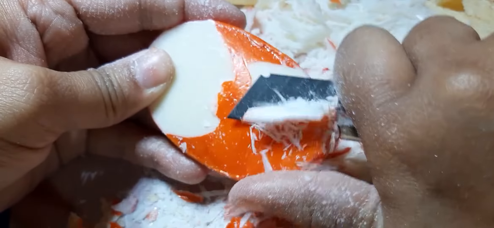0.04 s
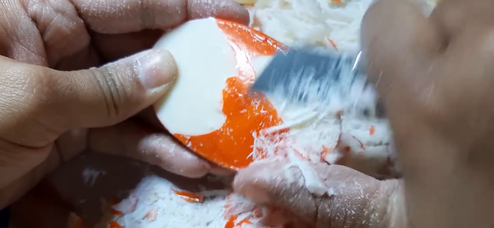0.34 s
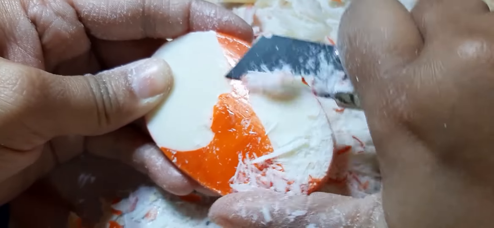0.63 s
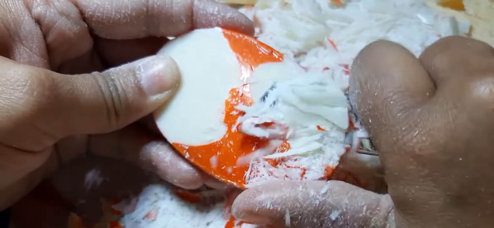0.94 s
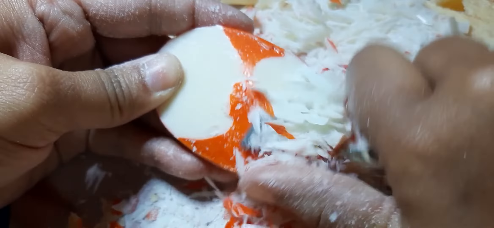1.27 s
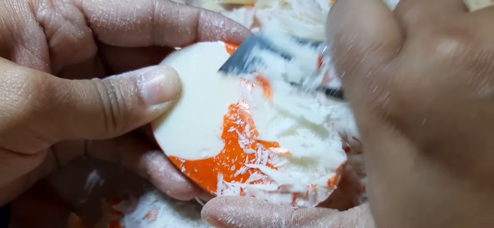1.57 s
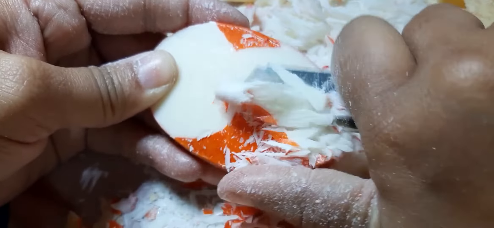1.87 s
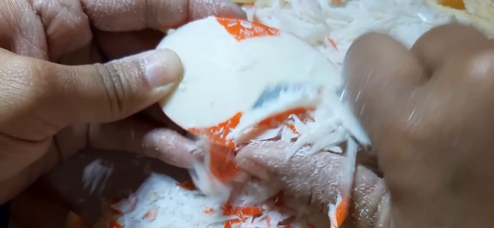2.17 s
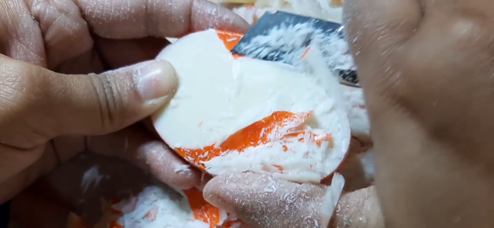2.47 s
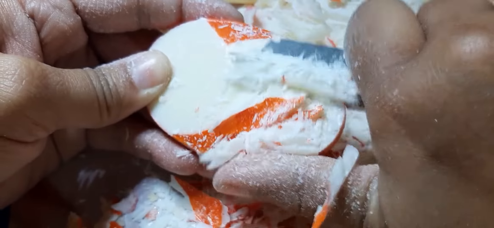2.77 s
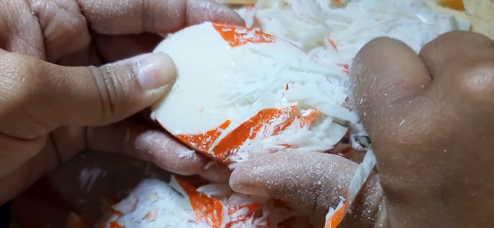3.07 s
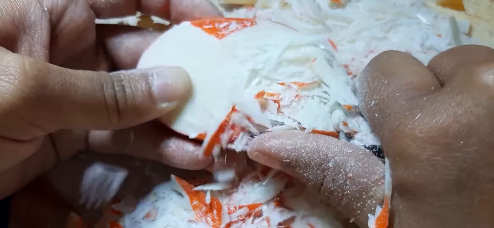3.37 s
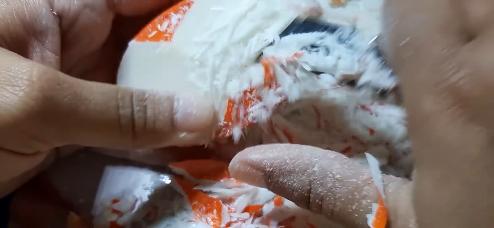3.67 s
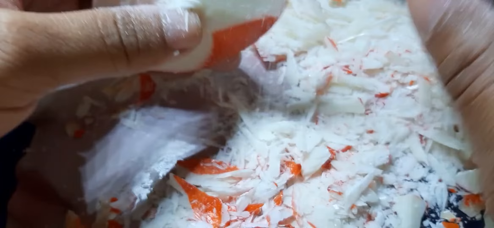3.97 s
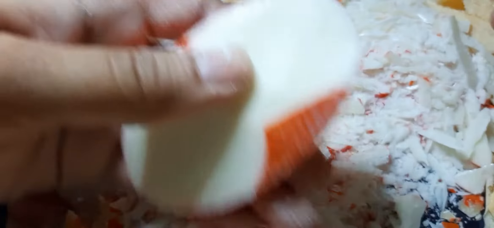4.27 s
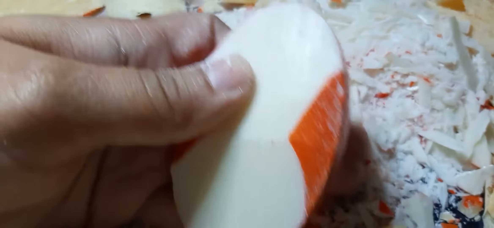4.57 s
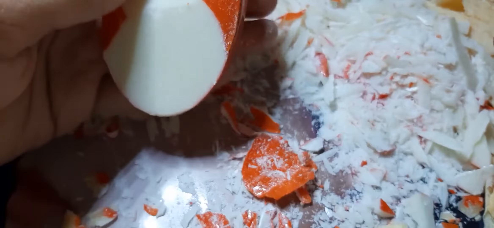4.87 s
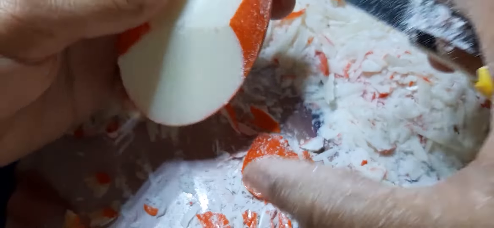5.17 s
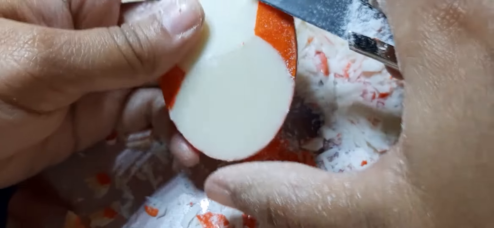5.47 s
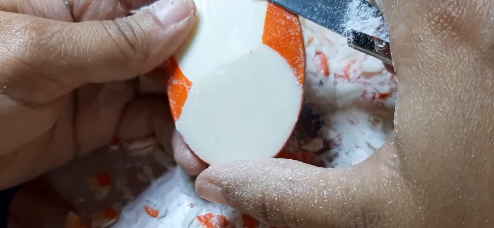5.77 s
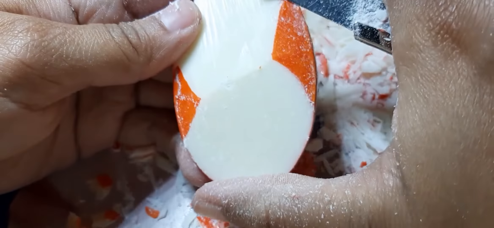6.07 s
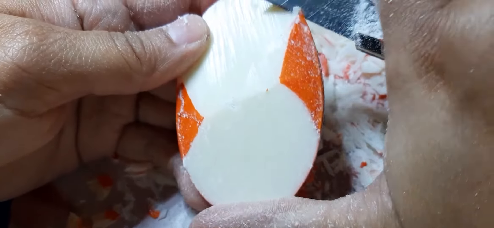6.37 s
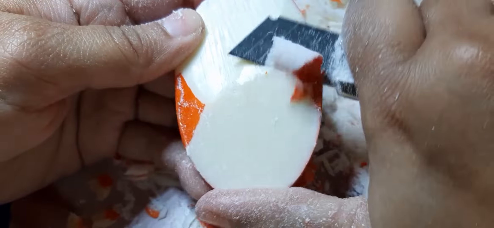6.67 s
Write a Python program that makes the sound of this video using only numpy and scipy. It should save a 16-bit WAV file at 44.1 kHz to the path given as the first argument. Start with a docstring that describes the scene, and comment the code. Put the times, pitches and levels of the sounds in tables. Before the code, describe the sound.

Heard close up in a quiet room, dry soap crackles and rasps as a hand-held blade shaves it stroke after stroke, shedding tiny ticking flakes. Midway come a few taps, a brief metallic flick of the blade and a louder rustling sweep through the loose shavings. Small clicks and faint finger rubbing follow as the bar is gripped anew, then one more crunchy cut near the end.

```python
"""Shaving a dry bar of soap

A utility blade cuts the soap close by, over a table in a quiet room. Its edge rasps through the crust
in countless tiny breaks, then sticks and slips in crunchy bursts that thud through the bar.
Flakes snap off and patter down. Midway, hands shake off the loose shavings, sweep them aside
and grip the bar anew, and the cutting goes on."""
import sys
import numpy as np
from scipy import signal
from scipy.fft import rfft, irfft
from scipy.io import wavfile
from scipy.ndimage import uniform_filter1d

SR = 44100
rng = np.random.default_rng(int(sys.argv[2]) if len(sys.argv) > 2 else 0)


def generate_wav(signal):
    """Clip the signal to [-1, 1] and save it as 16-bit WAV at the path in sys.argv[1]."""
    frames = np.transpose(np.atleast_2d(signal))
    scaled = np.clip(frames, -1, 1) * 32767
    pcm = np.round(scaled).astype(np.int16)
    wavfile.write(sys.argv[1], SR, pcm)


N = 304731

# Levels in the tables are relative: a function may turn a whole layer up or down.
# where the bar, the blade and the crumbs sound: (lowest pitch [Hz], highest pitch [Hz])
BASS, MIDDLE, TREBLE = (25, 450), (450, 3500), (3500, 18000)
# tone colours, or how strong each pitch is in a sound: (pitch [Hz], level [dB])
FLAT_COLOUR = [(1, 0), (SR, 0)]
ROOM_COLOUR = [(30, -13.5), (80, -1.5), (500, -2), (1250, -12), (3300, -19.5), (5500, -7.5), (11000, -9),
               (16000, -22.5)]
SHAVINGS_COLOUR = [(25, -17.5), (70, 5), (170, 4), (300, 5), (700, -1.5), (1600, -8), (3800, -12.5),
                   (6500, -6), (10500, -8.5), (13000, -11.5), (16000, -32.5)]
SKIN_COLOUR = [(60, 6), (300, -3), (900, -3), (1400, -19), (3500, -14), (5500, -3.5), (10000, -5),
               (16000, -13)]  # skin on soap
SOAP_COLOUR = [(25, -36), (60, -0.5), (200, 0.5), (450, -10.5), (1000, -12.5), (1800, -19), (3000, -25),
               (5000, -24.5), (8000, -22), (13000, -24), (16000, -34.5)]  # soap breaking
# resonances, the pitches at which a thing likes to ring: (pitch [Hz], width [Hz], boost [dB])
TABLE_RESONANCES = [(292.6, 70, -3.5), (479, 120, -4.5), (770, 400, 1.5), (2470, 210, 3.5)]
PALM_RESONANCES = [(310, 55, 6), (516, 380, 9), (690, 120, 5), (890, 76, 8), (5450, 700, 10)]  # the hollow between hand and bar
CUT_RESONANCES = [(85, 87, 6), (162, 86, 4), (1580, 180, 4.5), (2152, 366, 12.5), (3200, 170, 1),
                  (4550, 210, 3.5), (5290, 870, 4), (6550, 490, 3), (7550, 580, 4), (9710, 990, -3),
                  (11080, 390, 3.5)]  # the hand-held bar and the blade
# passing changes of tone: a list of (start [s], end [s]), then one of (pitch [Hz], width [Hz], boost [dB])
CRUSHING_HEAP = [(4.3, 4.46)], [(3305, 1040, 6.5)]  # the hand lands on the shavings
AT_THE_RIM = [(1.0, 1.09), (2.95, 3.26)], [(200, 110, 5), (4580, 1040, 8.5), (3120, 1300, -3)]  # the blade cuts at the rim of the bar
DIGGING_IN = [(1.5, 2.0), (6.54, 6.91)], [(65.2, 110, -10), (215.5, 370, 2), (2135, 420, -1.5),
              (3140, 280, 3), (4200, 940, 1)]  # the blade cuts deep
FRESH_FACE = [(6.28, 6.6)], [(2390, 260, 5.5), (5100, 1600, -5.5), (8700, 940, 6.5), (12400, 3000, -2)]  # the blade meets a smooth, uncut side

# loose flakes patter down: (start [s], length [s], level [dB])
FLAKE_SHOWERS = [(0.422, 0.03, -47), (.56, 0.45, -49), (1.109, 0.091, -55), (2.015, 0.13, -50),
                 (2.517, .45, -48), (3.421, 0.28, -48.5), (3.72, 0.23, -44), (3.943, .17, -51.5)]
# the bar settles into the cupped hand: (time [s], level [dB])
PALM_KNOCKS = [(4.41, -36), (5.695, -58), (6.255, -48.5)]
# fingertips slide over the bar: (start [s], length [s], level [dB])
FINGER_SLIDES = [(4.08, 0.2, -79.5), (5.686, 0.58, -78.5)]
# chips and knife knock on soap and table: (time [s], tick [dB], knock [dB], thump [dB])
TAPS = [(0.213, -62, -51, -54), (1.352, -58, -52.5, -58), (3.567, -48.5, -48.5, -64),
        (3.708, -37, -35, -42), (3.748, -50, -46, -45), (3.78, -50, -47, -66), (3.87, -38, -41.5, -75),
        (3.914, -45.5, -37, -75), (4.39, -40, -33.5, -26), (5.025, -49.5, -35.5, -63),
        (5.033, -50, -49, -46), (5.075, -58, -50.5, -52), (5.115, -70, -47, -53), (5.227, -43.5, -47, -52),
        (5.237, -55, -44.5, -49), (5.312, -74, -49.5, -53), (5.418, -45.5, -37.5, -45),
        (5.462, -43, -43, -62), (6.255, -57, -61, -55)]
# the free blade rings when flicked: (pitch [Hz], level [dB], time to fade by 60 dB [s])
BLADE_TONES = [(1100, -45, 0.1), (1130, -58, 0.043), (5200, -40, 0.027), (5940, -38, 0.038)]
# the flat of the blade knocks on the bar: (time [s], level [dB])
BLADE_KNOCKS = [(0.315, -45), (.341, -41.5), (.431, -49)]
# the sliding blade sings faintly: (pitch [Hz], level [dB])
SWISH_TONES = [(2050, -5), (3600, 2), (5400, 1), (6300, -2.5), (7600, -12.5)]
# single flakes snap off: (time [s], level [dB], pitch [Hz])
FLAKE_SNAPS = [(.004, -31.5, 8650), (.094, -19.5, 11400), (.201, -36.5, 9800), (.27, -42.5, 8200),
               (.581, -36, 7660), (.603, -29.5, 9150), (.918, -28.5, 7980), (.987, -36.5, 10500),
               (1.053, -31, 13000), (1.128, -41, 7500), (1.631, -35, 9070), (1.641, -37, 9100),
               (1.737, -29, 9700), (1.775, -33, 7200), (2.118, -41.5, 6500), (2.386, -42, 6560),
               (2.578, -39.5, 9100), (2.825, -38.5, 9560), (2.866, -47, 7000), (2.985, -30, 5180),
               (3.346, -43, 7850), (3.411, -32, 5700), (3.466, -42, 6840), (3.684, -38.5, 8500),
               (3.869, -21, 5700), (3.883, -33, 6050), (3.93, -38, 7843), (4.323, -36, 9100),
               (4.359, -31, 7200), (4.452, -37, 6800), (4.67, -21, 6640), (5.072, -37.5, 10500),
               (6.169, -49, 7740), (6.3012, -39.5, 8550), (6.581, -31, 12000), (6.76, -28.5, 10000)]
# rubbing moves: (start [s], length [s], treble [dB], bass [dB], change over the move [dB])
HAND_RUBS = [(3.33, 0.49, -69.5, -71.5, 4), (3.53, 0.16, -56, -52.5, -12), (3.68, 0.25, -56, -57, -5),
             (3.92, 0.13, -66.5, -73, -4.5), (4.26, 0.079, -72.5, -69, 18.5), (4.305, 0.084, -44, -38, -1),
             (4.39, 0.17, -40, -45, -1.5), (4.53, 0.2, -38, -47.5, -5), (4.75, 0.066, -79, -48, -15.5),
             (4.95, 0.31, -58.5, -58.5, -6), (5.19, 0.32, -58.5, -58, -3.5)]  # hands rub the bar and push shavings about
BLADE_SKIMS = [(0.2, 0.11, -62.5, -53.5, 5.5), (0.305, 0.065, -48, -42.5, -6),
               (1.232, 0.12, -53.5, -64, -4.5), (2.125, 0.097, -54, -46.5, 1.5),
               (2.22, 0.075, -51, -57, -5), (2.405, 0.11, -56.5, -68, 3.5)]  # the flat of the blade slides back between cuts
LIGHT_TOUCHES = [(0, 0.19, -54, -48.5, -15), (.36, 0.87, -61, -57.5, -2.5),
                 (1.36, 0.98, -60.5, -65.5, -1.5), (2.4, 1, -59, -56.5, -10.5),
                 (5.973, 0.26, -76.5, -98, 10), (6.235, 0.63, -63, -63.5, 9.5)]  # edge and fingers stay lightly on the bar
DEEP_CUTS = [(-0.01, 0.087, -49, -37, -3), (.49, 0.19, -46, -44.5, -5.5), (.68, 0.36, -55, -42, -9),
             (1.51, 0.36, -40.5, -35.5, -19), (1.85, 0.11, -40.5, -53, -2), (2.5, 0.35, -54, -43, -2.5),
             (2.85, 0.19, -58.5, -51.5, -7), (6.3, 0.06, -68, -63, 13), (6.35, 0.13, -47.5, -47, -12),
             (6.47, 0.24, -53.5, -55, 12.5), (6.73, 0.046, -53, -54, 4.5), (6.87, 0.038, -59.5, -53, 15)]  # the blade is pulled through the crust
# the blade's strongest resonance slides as the contact moves along the edge:
# (start [s], length [s], first pitch [Hz], last pitch [Hz], boost [dB])
BLADE_GLIDES = [(0.198, 0.071, 10100, 9400, 16.5), (0.305, 0.073, 7650, 7040, 11),
                (.5, 0.74, 6450, 6700, 5.5), (2.105, 0.078, 6000, 6120, 10), (2.452, 0.5, 5470, 5150, 6.5),
                (6.013, 0.39, 5060, 4950, 15), (6.324, 0.22, 6900, 6700, 7)]
# the edge breaks free and jumps ahead: (time [s], length [s], crackle [dB], thud of the bar [dB])
SLIPS = [(0.035, 0.0088, -42, -33.5), (0.059, 0.039, -43.5, -40), (0.104, 0.0077, -57, -39),
         (0.201, 0.035, -57, -47.5), (0.268, 0.015, -49.5, -48.5), (0.31, 0.008, -43, -63),
         (0.519, 0.0053, -48, -46.5), (0.562, 0.036, -51.5, -52), (0.598, 0.007, -42.5, -39),
         (0.631, 0.01, -50, -44), (.648, 0.0082, -45, -39), (0.704, 0.03, -47, -40),
         (0.782, 0.0093, -38.5, -38.5), (0.825, 0.0088, -44.5, -37), (0.855, 0.0097, -44.5, -37.5),
         (0.914, 0.01, -47, -31.5), (0.946, 0.0099, -48, -49), (0.969, 0.017, -54, -39),
         (1.0117, 0.0045, -40.5, -44), (1.021, 0.022, -48.5, -40.5), (1.047, 0.033, -43.5, -49.5),
         (1.399, 0.0082, -45.5, -51.5), (1.531, 0.0077, -44, -38), (1.6, 0.029, -46.5, -41),
         (1.725, 0.0087, -53, -37.5), (1.781, 0.0039, -33, -31), (1.8454, 0.0035, -21, -16.5),
         (1.869, 0.01, -44, -31), (1.885, 0.011, -46, -31), (1.929, 0.03, -43.5, -42.5),
         (1.957, 0.019, -32.5, -46), (2, 0.003, -40, -48), (2.156, 0.0068, -45.5, -47),
         (2.213, 0.0073, -46, -45.5), (2.534, 0.0051, -45.5, -50), (2.6832, 0.0089, -43, -35.5),
         (2.719, 0.014, -42.5, -37), (2.779, 0.014, -44, -35.5), (2.802, 0.028, -50.5, -42.5),
         (2.833, 0.0057, -47.5, -54), (2.9, 0.0061, -50, -40.5), (2.979, 0.0098, -45, -39.5),
         (2.993, 0.0068, -44.5, -42), (3.051, 0.01, -52.5, -54), (3.12, 0.011, -60, -65),
         (3.18, 0.016, -49, -47), (3.198, 0.0086, -41.5, -40), (3.209, 0.01, -38, -62),
         (6.545, 0.034, -48, -45), (6.621, 0.0042, -34.5, -55), (6.644, 0.0037, -33.5, -65),
         (6.674, 0.0086, -44, -38), (6.69, 0.018, -36, -38), (6.743, 0.035, -46.5, -79),
         (6.786, 0.012, -44, -43.5)]


def amp(db):
    """Turn decibels into a number to multiply by."""
    return 10 ** (np.asarray(db) / 20)


def unit(x):
    """Scale a sound to an average (rms) strength of 1."""
    return x / np.sqrt(np.mean(x ** 2) + 1e-20)


def add(out, start_s, x):
    """Mix x into out, beginning at start_s."""
    i = max(0, int(start_s * SR))
    out[i:i + len(x)] += x[:max(0, len(out) - i)]


def wander(rate_hz):
    """A smooth random drift around zero, about 1 in size."""
    step = max(2, int(SR / rate_hz))
    return unit(uniform_filter1d(np.repeat(rng.standard_normal(N // step + 1), step), step)[:N])


def response(colour, resonances=(), band=(10, 20000), size=4096):
    """How an object answers one click, given its tone colour, resonances and pitch range."""
    f = np.arange(size // 2 + 1) * SR / size + 1
    hz, db = np.transpose(colour)
    peaks_db = sum(boost / (1 + (2 * (f - pitch) / width) ** 2) for pitch, width, boost in resonances)
    gain = amp(np.interp(np.log(f), np.log(hz), db) + peaks_db)
    gain /= np.sqrt((1 + (band[0] / f) ** 8) * (1 + (f / band[1]) ** 8))
    # put all the ringing after the click, none before it
    cepstrum = irfft(np.log(gain + 1e-6))
    cepstrum[1:size // 2] *= 2
    cepstrum[size // 2 + 1:] = 0
    return irfft(np.exp(rfft(cepstrum)))


def ring(x, body):
    """Let x shake an object whose answer to a click is body."""
    return signal.fftconvolve(x, body)[:len(x)]


def strike(force, body, db, length_s):
    """A short push rings an object, with as much energy as the level db held for length_s."""
    sound = signal.fftconvolve(force, body)
    return sound * amp(db) * np.sqrt(length_s * SR / (np.sum(sound ** 2) + 1e-20))


def resonate(x, hz, width_hz):
    """Keep the part of x near one pitch, which may move."""
    turn = np.exp(2j * np.pi * np.cumsum(hz) / SR)
    keep = np.exp(-np.pi * width_hz / SR)
    return 2 * np.real(signal.lfilter([1 - keep], [1, -keep], x * turn.conj()) * turn)


def recolour(x, spans, resonances, fade_s=0.017):
    """Give the sound extra resonances during the given stretches of time."""
    t = np.arange(N) / SR
    inside = sum(1. * ((t > start) & (t < end)) for start, end in spans)
    share = uniform_filter1d(inside, int(fade_s * SR))
    return (1 - share) * x + share * ring(x, response(FLAT_COLOUR, resonances))


def contact_resonances(width_hz=420, spread_db=5.0, top_hz=14000, count=18):
    """Each point of contact favours some random pitches and weakens others."""
    pitches = rng.uniform(MIDDLE[0], top_hz, count)
    boosts = spread_db * rng.standard_normal(count)
    return [(hz, width_hz, boost) for hz, boost in zip(pitches, boosts)]


def fractures(samples, per_s, spread_db):
    """Tiny breaks at random moments: many faint, a few strong."""
    strength, direction, chance = rng.random((samples, 3)).T
    size = amp(spread_db * np.minimum(-np.log(1 - strength), 4))
    return size * np.sign(direction - .5) * (chance < per_s / SR)


def crack(decay_s, rise_s=0.000083, tail_db=-21, tail_s=0.0031, samples=700):
    """One sharp break, followed by a few milliseconds of crumbling."""
    t = np.arange(samples) / SR
    fade = np.exp(-t / decay_s) + amp(tail_db) * np.exp(-t / tail_s)
    return rng.standard_normal(samples) * (1 - np.exp(-t / rise_s)) * fade


def pressure(moves, attack_s, release_s):
    """Treble and bass levels in dB: each move swells, gains or loses force, then dies away."""
    t, gain = np.arange(N) / SR, np.full((2, N), amp(-120))
    for start, length, treble_db, bass_db, change_db in moves:
        swell = np.clip((t - start) / attack_s, 0, 1) ** 2
        fade = np.exp(-np.maximum(t - start - length, 0) / release_s)
        change = amp(change_db * np.clip((t - start) / length, 0, 1))
        gain = np.hypot(gain, amp([[treble_db], [bass_db]]) * swell * fade * change)
    return 20 * np.log10(gain)


def room_tone(level_db=-70.5, waver_db=1.1, waver_hz=8.8):
    """The quiet room: a soft noise whose level wavers a little."""
    noise = unit(ring(rng.standard_normal(N), response(ROOM_COLOUR)))
    return noise * amp(level_db + waver_db * wander(waver_hz))


def room_echo(x, echo_db=-21, fade_s=0.26, dull_hz=6000, gap_s=0.0014):
    """The walls add a faint, short echo that drops by 60 dB in fade_s."""
    t = np.arange(SR // 2) / SR
    tail = rng.standard_normal(len(t)) * amp(-60 * t / fade_s) * (t > gap_s)
    tail = signal.sosfilt(signal.butter(1, dull_hz, fs=SR, output="sos"), tail)
    return x + amp(echo_db) * ring(x, tail / np.sqrt(np.sum(tail ** 2)))


def crumbs(busy_db, per_s=28, base_db=-63, spread_db=9.5, follow=0.61, reference_db=-60):
    """Crumbs break loose and land at random, louder while blade or hand are busy."""
    out = np.zeros(N)
    for when, smallness, pitch in rng.random((int(per_s * N / SR), 3)):
        hz = TREBLE[0] * 2 ** (2 * pitch)
        colour = [(hz / 4, -16), (hz, 0), (hz * 2, -8)]
        crumb = response(colour, contact_resonances(), (600, 14000), size=512)
        db = base_db + follow * (busy_db[int(when * N)] - reference_db)
        db -= spread_db * np.log(smallness + 0.23)
        add(out, when * N / SR, strike(crack(decay_s=0.0004), crumb, db, length_s=0.0014))
    return out


def falling_flakes(per_s=70, spread_db=2.0):
    """Small flakes land one after another, each with a very short, thin tick."""
    out = np.zeros(N)
    colour = [(3000, -15), (5500, 5.5), (11000, 3.5), (16000, -2)]
    for start, length, shower_db in FLAKE_SHOWERS:
        for when, smallness in rng.random((int(per_s * length), 2)):
            flake = response(colour, contact_resonances(), (1000, 16000), size=512)
            db = shower_db - spread_db * np.log(smallness + 0.099)
            add(out, start + when * length, strike(crack(decay_s=0.00041), flake, db, length_s=0.00048))
    return out


def grip(fade_s=0.04, waver_db=4.5, waver_hz=30):
    """Bar and fingers shift in the cupped hand: hollow knocks and a faint rub."""
    knocks, t = np.zeros(N), np.arange(N) / SR
    hollow = response(SKIN_COLOUR, PALM_RESONANCES, (150, 1100))
    for start, db in PALM_KNOCKS:
        add(knocks, start, strike(crack(decay_s=0.0079, samples=2400), hollow, db, length_s=0.0066))
    sliding = sum(amp(db) * ((t > start) & (t < start + length)) for start, length, db in FINGER_SLIDES)
    loudness = uniform_filter1d(sliding, int(fade_s * SR)) * amp(waver_db * wander(waver_hz))
    rub = unit(ring(rng.standard_normal(N), response(SKIN_COLOUR, PALM_RESONANCES)))
    return knocks + loudness * rub


def taps(bodies, tick_s=0.00079, knock_s=0.0027, length_s=0.0055):
    """Small, hard hits: a short tick over a duller knock of the table."""
    out = np.zeros(N)
    bass, middle, treble = bodies
    for start, tick_db, knock_db, thump_db in TAPS:
        add(out, start, strike(crack(tick_s), treble, tick_db, length_s))
        add(out, start, strike(crack(knock_s), middle, knock_db, length_s))
        add(out, start, strike(crack(knock_s), bass, thump_db, length_s))
    return out


def blade_flick(start_s=3.8335, rise_s=0.00058, scuff_db=-36, scuff_s=0.016, scuff_hz=3500):
    """The blade scuffs off the bar and rings freely for a moment."""
    out, t = np.zeros(N), np.arange(SR // 10) / SR
    tone = 2 * sum(amp(db - 60 * t / fade) * np.sin(2 * np.pi * hz * t) for hz, db, fade in BLADE_TONES)
    noise = resonate(rng.standard_normal(len(t)), np.full(len(t), scuff_hz), width_hz=3500)
    scuff = amp(scuff_db) * unit(noise) * np.exp(-t / scuff_s)
    add(out, start_s, (tone + scuff) * (1 - np.exp(-t / rise_s)))
    return out


def blade_knocks(hz=2000, width_hz=500, boost_db=20):
    """A light knock on the bar rings mainly one resonance of the blade."""
    out = np.zeros(N)
    steel = response(SOAP_COLOUR, [(hz, width_hz, boost_db)], (1000, TREBLE[1]))
    for start, db in BLADE_KNOCKS:
        add(out, start, strike(crack(decay_s=0.002), steel, db, length_s=0.0046))
    return out


def blade_swishes(bodies, flicker_db=4, flicker_hz=50, drift=0.084, drift_hz=24, hollow_hz=1500):
    """The flat blade drags over fine grit: faint drifting tones, a hollow rasp and a dry hiss."""
    bass, _, treble = bodies
    swish, thud = amp(pressure(BLADE_SKIMS, attack_s=0.022, release_s=0.013))
    grit = fractures(N, per_s=2200, spread_db=3.0)
    song = np.zeros(N)
    for hz, db in SWISH_TONES:
        tone = resonate(grit, hz * (1 + drift * wander(drift_hz)), width_hz=290)
        song += tone * amp(db + flicker_db * wander(flicker_hz))
    centre_hz = hollow_hz * (1 + 2 * drift * wander(drift_hz))
    hollow = resonate(resonate(grit, centre_hz, width_hz=1300), centre_hz, width_hz=1300)
    hiss = ring(grit, treble)
    rub = amp(-4) * unit(song) + amp(-2.5) * unit(hollow) + amp(-5) * unit(hiss)
    return swish * rub + thud / 2 * unit(ring(grit, bass))


def blade_glides(x, relative_width=0.065, duck=0.16):
    """One resonance of the blade stands out and slides in pitch while the rest gets a bit quieter."""
    out = x.copy()
    for start, length, from_hz, to_hz, boost_db in BLADE_GLIDES:
        part = x[int(start * SR):int((start + length) * SR)]
        peak = resonate(part, np.geomspace(from_hz, to_hz, len(part)), relative_width * from_hz)
        sung = (part + (amp(boost_db) - 1) * peak) * amp(-duck * boost_db)
        add(out, start, (sung - part) * signal.windows.tukey(len(part)))
    return out


def flake_snaps():
    """Brittle flakes snap off, each ticking at its own pitch; higher ticks stand for smaller flakes."""
    out = np.zeros(N)
    for start, db, hz in FLAKE_SNAPS:
        colour = [(hz / 3, -16), (hz, 0), (hz * 2, -12), (hz * 3, -24)]
        flake = response(colour, CUT_RESONANCES, (MIDDLE[0], TREBLE[1]), size=1024)
        add(out, start, strike(crack(decay_s=0.00027), flake, db, length_s=0.00065))
    return out


def friction(levels_db, bodies, per_s, spread_db, judder_hz, judder_db, shift_hz, shift_db,
             thud_db, rasp_db, crumb_db, bass_share, patchy_db=0, points=5):
    """Shaky rubbing makes many tiny breaks, heard as a low thud, a middle rasp and high crumbling."""
    # the load shifts between points of contact; patchy_db sets how unlike they sound
    loads = np.array([amp(shift_db * wander(shift_hz)) for _ in range(points)])
    loads /= np.sqrt(np.sum(loads ** 2, axis=0))
    contacts = [response(FLAT_COLOUR, contact_resonances(spread_db=patchy_db), size=512) for _ in loads]
    breaks = sum(unit(ring(fractures(N, per_s / points, spread_db) * load, contact))
                 for load, contact in zip(loads, contacts))
    breaks *= amp(judder_db * wander(judder_hz))
    treble_db, bass_db = levels_db
    middle_db = (1 - bass_share) * treble_db + bass_share * bass_db
    bands_db = (bass_db + thud_db, middle_db + rasp_db, treble_db + crumb_db)
    return sum(unit(ring(breaks, body)) * amp(db) for body, db in zip(bodies, bands_db))


def sticking(dip_db=-11, lead_s=0.00034, half_width_s=0.015):
    """The edge sticks, so its drag goes quiet around the start of each slip; gives the dip in dB."""
    stuck = np.zeros(N)
    for start, *_ in SLIPS:
        add(stuck, start - lead_s - half_width_s, np.hanning(int(2 * half_width_s * SR)))
    return dip_db * np.minimum(stuck, 1)


def slips(rise_s=0.00013, fall_s=0.0043, sag=1.04, lurch=0.37, rasp_db=-2.5, bass_share=0.22):
    """The edge jumps ahead in a burst of breaks: the crust crackles, the blade rasps, the bar thuds."""
    out = np.zeros(N)
    bar = response(SOAP_COLOUR, CUT_RESONANCES, BASS)
    for start, length, crackle_db, thud_db in SLIPS:
        resonances = CUT_RESONANCES + contact_resonances()
        blade, crust = (response(SOAP_COLOUR, resonances, band, size=1024) for band in (MIDDLE, TREBLE))
        t = np.arange(int((length + 4 * fall_s) * SR)) / SR
        swell = 1 - np.exp(-t / (rise_s + 0.1 * length))
        shape = swell * np.exp(-sag * t / length - np.maximum(t - length, 0) / fall_s)
        breaks = unit(fractures(len(t), per_s=8000, spread_db=3.0)) * shape
        jolt = breaks - lurch * shape  # the sudden release of force also shoves the bar
        blade_db = (1 - bass_share) * crackle_db + bass_share * thud_db + rasp_db
        add(out, start, strike(breaks, crust, crackle_db, length))
        add(out, start, strike(breaks, blade, blade_db, length))
        add(out, start, strike(jolt, bar, thud_db, length))
    return out


def scene():
    """Mix cutting, handling and loose bits of soap in the quiet room, as one channel."""
    soap = [response(SOAP_COLOUR, CUT_RESONANCES, band) for band in (BASS, MIDDLE, TREBLE)]
    table = [response(SHAVINGS_COLOUR, TABLE_RESONANCES, band) for band in (BASS, MIDDLE, TREBLE)]
    cut_db = pressure(DEEP_CUTS, attack_s=0.012, release_s=0.013) + sticking()
    touch_db = pressure(LIGHT_TOUCHES, attack_s=0.027, release_s=0.018) + sticking() / 2
    hand_db = pressure(HAND_RUBS, attack_s=0.047, release_s=0.026)
    drag = friction(cut_db, soap, per_s=2300, spread_db=2.5,
                    judder_hz=90.5, judder_db=3.7, shift_hz=22.17, shift_db=2.5,
                    thud_db=-2.5, rasp_db=-1.5, crumb_db=-3.0, bass_share=0.067)
    touch = friction(touch_db, soap, per_s=3500, spread_db=2.5,
                     judder_hz=75.5, judder_db=5.0, shift_hz=22.32, shift_db=13.5,
                     thud_db=-6.0, rasp_db=-1.0, crumb_db=-4.0, bass_share=0.2, patchy_db=1.5)
    cutting = blade_glides(drag + touch + slips() + blade_swishes(soap) + blade_knocks())
    for spans, resonances in (AT_THE_RIM, DIGGING_IN, FRESH_FACE):
        cutting = recolour(cutting, spans, resonances)
    sweep = friction(hand_db, table, per_s=16000, spread_db=4.0,
                     judder_hz=159.5, judder_db=2.0, shift_hz=39.95, shift_db=7.0,
                     thud_db=-0.5, rasp_db=0.5, crumb_db=0.3, bass_share=0.62)
    handling = recolour(sweep, *CRUSHING_HEAP) + taps(table) + blade_flick() + grip()
    busy_db = np.max([cut_db[0], touch_db[0], hand_db[0]], axis=0)  # the loudest treble level
    loose_crumbs = crumbs(busy_db)
    background = room_tone()
    foreground = cutting + flake_snaps() + falling_flakes() + loose_crumbs + handling
    return (room_echo(foreground) + background)[None]


def record(dry):
    """Cut away the very highest treble, above 16100 Hz."""
    return signal.sosfilt(signal.ellip(8, .2, 70, 16100, fs=SR, output="sos"), dry)


dry = scene()
out = record(dry)
generate_wav(out)
```